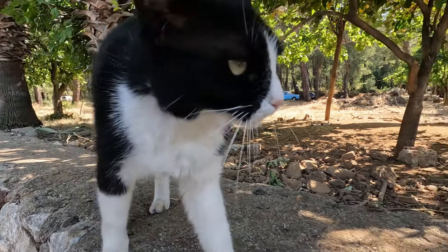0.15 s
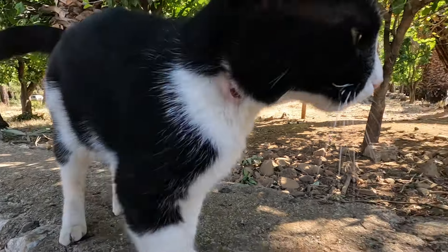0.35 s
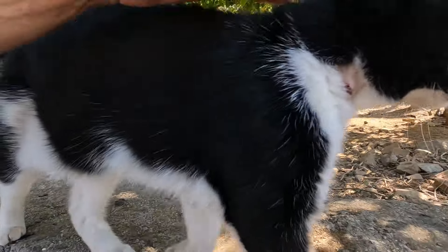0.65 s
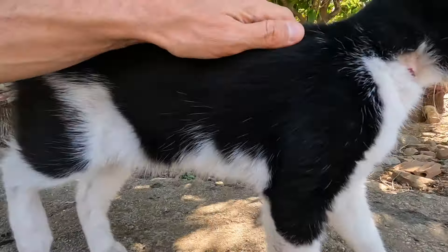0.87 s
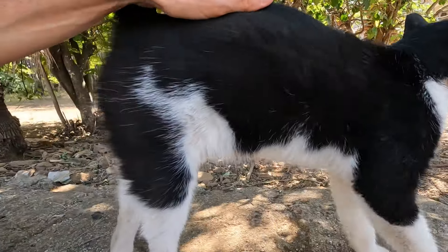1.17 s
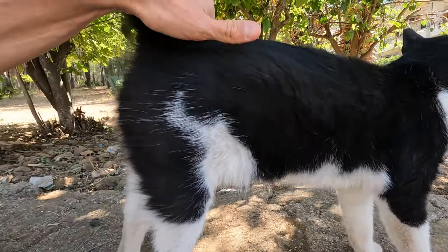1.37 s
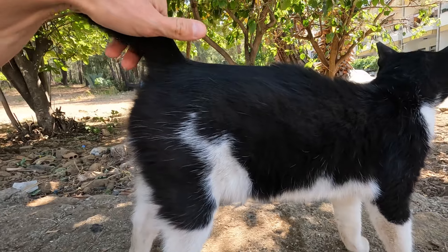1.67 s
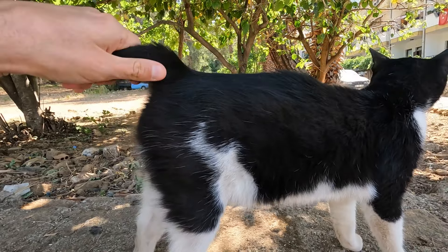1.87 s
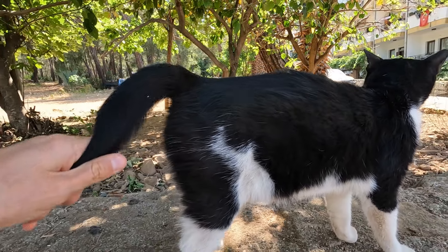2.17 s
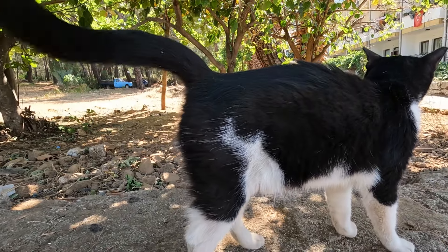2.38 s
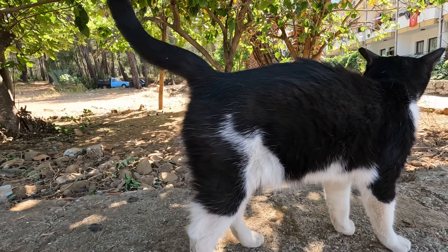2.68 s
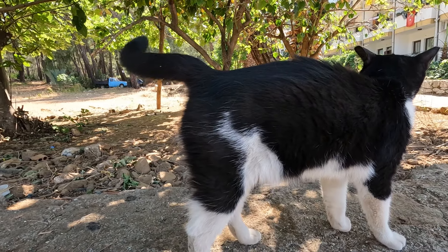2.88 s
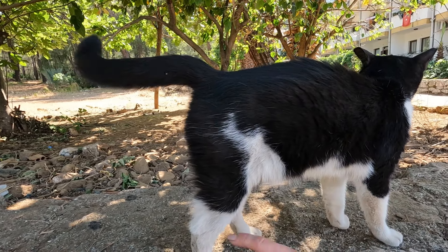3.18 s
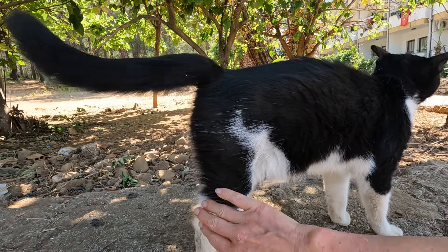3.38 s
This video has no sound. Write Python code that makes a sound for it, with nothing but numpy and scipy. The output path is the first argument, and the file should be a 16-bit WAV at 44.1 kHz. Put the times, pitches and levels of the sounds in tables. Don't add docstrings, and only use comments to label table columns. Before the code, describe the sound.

Cat trills, snorts and mews briefly, then quiet yard with distant engine, insects and birds.

```python
import sys
import numpy as np
from scipy import signal
from scipy.fft import rfft, irfft
from scipy.io import wavfile
from scipy.ndimage import uniform_filter1d

SR = 44100
rng = np.random.default_rng(int(sys.argv[2]) if len(sys.argv) > 2 else 0)


def gain_from_decibels(decibels):
    exponent = np.asarray(decibels, float) / 20
    return 10 ** exponent


def store_wav(level_fs):
    pcm = np.round(np.clip(np.atleast_2d(level_fs), -1, 1) * 32767)
    wavfile.write(sys.argv[1], SR, pcm.T.astype(np.int16))


N = 156114


def evened(x):
    return x / np.sqrt(np.mean(x ** 2) + 1e-20)


def read(points, hz):
    f, value = np.transpose(points)
    return np.interp(np.log(hz + 1), np.log(f + 1), value)


def curves(rows):
    t, columns = np.arange(N) / SR, np.transpose(rows)
    first, last = columns[0, 0], columns[0, -1]
    since_start = t - first + 1e-9 + (first < .01)
    until_end = last - t + (last > 3)
    gate = np.clip(np.minimum(since_start, until_end) / .008, 0, 1)
    return [np.interp(t, columns[0], v) for v in columns[1:]] + [gate]


def bump(centre, half):
    return np.cos(np.pi / 2 * np.clip((np.arange(N) / SR - centre) / half, -1, 1)) ** 2


def resonate(x, hz, width):
    turn = np.exp(2j * np.pi * np.cumsum(hz * np.ones(len(x))) / SR)
    r = np.exp(-np.pi * width / SR)
    return 2 * (turn * signal.lfilter([1 - r], [1, -r], x / turn)).real


def bands(x, table, slide=1):
    out = 0
    for hz, width, db in table:
        once = resonate(x, hz * slide, width)
        out = out + gain_from_decibels(db) * evened(resonate(once, hz * slide, width))
    return out


def slow(rate):
    t = np.arange(0, N, 64) / SR
    v = 0
    for f in np.geomspace(rate / 10, rate, num=20):
        v = v + np.sin(2 * np.pi * (f * t + rng.random())) / np.sqrt(f)
    return np.interp(np.arange(N) / SR, t, evened(v))


# (frequency [Hz], likeness [0-1])
EAR_LIKENESS = [(60, .95), (150, 1), (380, 0.94), (950, 0.71), (2380, 0.43), (5980, 0.53), (15000, 0.45)]


def field(colour, patchy_db, size):
    frames, hz = 4 * N // size + 5, np.fft.rfftfreq(size, 1 / SR)
    a, b, c, d, patches = rng.standard_normal((frames, len(hz), 5)).T
    patches = uniform_filter1d(patches, size=10, axis=0)
    patches = evened(uniform_filter1d(patches, size=10, axis=1))
    same = np.clip(read(EAR_LIKENESS, hz), -1, 1)[:, None]
    left = a + 1j * b
    right = same * left + np.sqrt(1 - same ** 2) * (c + 1j * d)
    inside = (hz >= colour[0][0]) & (hz <= colour[-1][0])
    gain = gain_from_decibels(read(colour, hz)[:, None] + patchy_db * patches) * inside[:, None]
    z = np.array([left, right]) * gain
    return evened(signal.istft(z, nperseg=size, noverlap=3 * size // 4)[1][:, :N])


# (frequency [Hz], level [dB])
RUMBLE_COLOUR = [(8.8, -45), (15, 1), (54, -1.5), (76, -3), (113, -3), (194, -8), (295, -12.5), (476, -25),
                 (600, -28.5), (780, -51), (1320, -120)]


def rumble():
    return gain_from_decibels(-32.5 + .8 * slow(9)) * field(RUMBLE_COLOUR, patchy_db=1.2, size=4096)


# (frequency [Hz], level [dB])
WASH_COLOUR = [(400, -6.5), (850, 0), (1130, 3), (2200, -14.5), (3300, -17), (6000, -29.5), (11500, -31.5),
               (15500, -53)]


def wash():
    return gain_from_decibels(-47) * field(WASH_COLOUR, patchy_db=1.42, size=512)


# (centre [s], half length [s], frequency [Hz], width [Hz], level [dB])
DRONE_SWELLS = [
    (.72, .2, 122, 8, -35),
    (.95, .35, 160, 8, -38),
    (.95, .5, 900, 160, -50),
    (2.45, .05, 2500, 200, -62),
    (2.9, .09, 3600, 1300, -57),
    (2.9, .9, 4900, 1100, -66),
]


def drones():
    out = 0
    for s, half, hz, width, db in DRONE_SWELLS:
        out = out + bump(s, half) * bands(rng.standard_normal(N), [(hz, width, db)])
    return out


# (time [s], firing rate [Hz], level [dB])
ENGINE_RUN = [(0, 55.94, -33.5), (.3, 58.17, -29.5), (.55, 59.36, -35.5), (.8, 61.67, -45),
              (1.15, 63.4, -33.5), (1.35, 65.56, -31.5), (1.6, 66.8, -31.5), (2.1, 68.65, -33),
              (2.3, 69.33, -32.5), (2.8, 70.1, -33), (3.54, 72.12, -31.5)]
ENGINE_ORDERS = [-1, -8, -16, -20.5]


def engine():
    hz, db, on = curves(ENGINE_RUN)
    waver_hz, throb_db = 2.85 / 4, 1
    phase = 2 * np.pi * np.cumsum(hz + waver_hz * slow(11)) / SR
    orders = 0
    for k, order_db in enumerate(ENGINE_ORDERS, 1):
        throb = throb_db * slow(5.3) * min(k, 2) / 2
        orders = orders + gain_from_decibels(order_db + throb) * np.cos(k * phase)
    return np.sqrt(2) * gain_from_decibels(db) * orders


# (frequency [Hz], width [Hz], level [dB])
INSECT_BANDS = [(7470, 1600, -61), (9700, 1300, -70)]


def insects():
    swarms = np.array([bands(rng.standard_normal(N), INSECT_BANDS) for ear in "lr"])
    spread = np.array([[0.86, 0.24], [0.27, 0.72]])
    return spread @ swarms * gain_from_decibels(0.6 * slow(60))


# (start [s], length [s], from [Hz], to [Hz], level [dB])
BIRD_HOOKS = [
    (2.668, .065, 6000, 5220, -63),
    (2.915, .065, 3800, 4700, -60),
    (3.06, .045, 5500, 5000, -63),
    (3.108, .055, 6300, 5050, -60),
    (2.47, .045, 4200, 4750, -64),
    (2.23, .04, 5600, 5400, -70),
    (2.415, .05, 2600, 2480, -66),
]
# (start [s], length [s], from [Hz], to [Hz], level [dB])
BIRD_SWEEPS = [
    (2.375, .04, 5200, 4200, -68),
    (2.832, .07, 4900, 3150, -59),
    (3.285, .04, 5500, 3700, -58),
    (3.385, .055, 3700, 4800, -62),
    (3.085, .02, 5400, 6500, -69),
    (2.9, .04, 3200, 3900, -68),
    (3.33, .035, 3500, 2800, -67),
    (2.44, .025, 4900, 4400, -67),
]


def birds():
    t, out, fuzz = np.arange(N) / SR, np.zeros(N), slow(400)
    hooks = [(*row, 4.2) for row in BIRD_HOOKS]
    sweeps = [(*row, 1.2) for row in BIRD_SWEEPS]
    for s, length, from_hz, to_hz, db, bend in hooks + sweeps:
        u = np.clip((t - s) / length, 0, 1)
        hz = to_hz + (from_hz - to_hz) * (1 - u) ** bend + 45 * fuzz
        swell = np.sqrt(2 * np.sin(np.pi * u).clip(0)) * gain_from_decibels(1.5 * slow(300))
        out += gain_from_decibels(db) * swell * np.sin(2 * np.pi * np.cumsum(hz) / SR)
    taps = rng.standard_normal((2, 4000)) * (rng.random((2, 4000)) < .05)
    taps = taps * gain_from_decibels(-np.arange(4000) / 160)
    taps = taps / np.linalg.norm(taps[0])
    return out + gain_from_decibels(-1.5) * signal.fftconvolve(out[None], taps, axes=1)[:, :N]


# (time [s], wash level [dB], left over right [dB])
CAMERA_TURN = [
    (0, 7.5, 4.5),
    (.5, 5, 3.5),
    (.9, 4, 1.5),
    (1.3, 2.5, 3.5),
    (2.1, 1.5, 2.5),
    (3.54, 1, 3),
]


def surroundings():
    wash_db, pan_db, on = curves(CAMERA_TURN)
    road = wash()
    dull = signal.sosfiltfilt(signal.butter(4, 1800, fs=SR, output="sos"), road)
    treble_db = .55 * wash_db + 0.87
    far = gain_from_decibels(wash_db) * dull + gain_from_decibels(treble_db) * (road - dull) + insects() + birds() + drones()
    return far * gain_from_decibels([pan_db / 2, -pan_db / 2])


# (time [s], peak level [dB], frequency [Hz])
CLAW_TICKS = [(.629, -43, 6800), (.667, -50, 5600), (.7358, -46, 4300), (.7468, -46, 5600),
              (.7752, -40, 4400), (.8415, -41, 3600), (.842, -43, 6800), (.8455, -54, 10000),
              (1.1833, -41, 3200), (1.197, -38, 3000), (1.427, -35, 1200), (1.475, -55, 10000),
              (1.52, -55, 10000), (1.556, -46, 5500), (1.604, -47, 5500), (2.97, -48, 2800)]
# (start [s], length [s], level [dB], centre [Hz])
PAW_SCUFFS = [
    (1.176, .03, -44, 3200),
    (1.178, .035, -65, 8000),
    (1.21, .16, -54, 3300),
    (1.4, .12, -61, 4800),
    (1.553, .02, -54, 4500),
    (1.585, .06, -54, 4800),
    (1.57, .08, -68, 8000),
    (2.32, .03, -60, 5000),
    (2.79, .05, -61, 4800),
]


def handling():
    out, t = np.zeros((2, N)), np.arange(300) / SR
    for s, db, hz in CLAW_TICKS:
        crack = rng.standard_normal(300) + .5 * rng.standard_normal((2, 300))
        crack = gain_from_decibels(-60 * t / .005) * crack
        tick = signal.lfilter(*signal.butter(2, [hz * .7, hz * 1.4], "band", fs=SR), crack)
        start = round(s * SR)
        out[:, start:start + 300] += gain_from_decibels(db) * tick / abs(tick).max()
    grains_per_s, spread_db = 2000, 3
    grains = rng.standard_normal(N) * (rng.random(N) < grains_per_s / SR)
    grains = grains * gain_from_decibels(spread_db * rng.exponential(1, N).clip(0, 4))
    grit = .5 * rng.standard_normal((2, N)) + grains
    for s, length, db, hz in PAW_SCUFFS:
        u = np.clip((np.arange(N) / SR - s) / length, 0, 3)
        b, a = signal.butter(3, [hz * .68, hz * 1.6], "band", fs=SR)
        stroke = np.minimum(u / .15, 1) * np.exp(-1.8 * u ** 2)
        out += gain_from_decibels(db) * evened(signal.lfilter(b, a, grit)) * stroke
    return out * gain_from_decibels([[1.2], [-1.2]])


# (time [s], level [dB])
SNORT_PUSH = [
    (.225, -61),
    (.25, -36.5),
    (.278, -33),
    (.295, -39),
    (.33, -42.5),
    (.395, -48.5),
    (.41, -65),
]
# (frequency [Hz], width [Hz], level [dB])
TIGHT_NOSE = [(1100, 450, 0), (1650, 300, -2), (2750, 500, -8), (3550, 900, -3), (4500, 1100, -5),
              (6400, 700, -11), (12500, 3500, -24)]
# (frequency [Hz], width [Hz], level [dB])
LOOSE_NOSE = [(1180, 830, 5), (1800, 500, -3), (3500, 800, -8), (4360, 700, -5.5), (5900, 800, -8),
              (7300, 600, -12), (12000, 4000, -22)]


def snort():
    db, on = curves(SNORT_PUSH)
    t = np.arange(N) / SR
    air = rng.standard_normal((2, N)) * gain_from_decibels(1.6 * slow(202))
    slide = 1 - .06 * np.clip((.27 - t) / 0.012, 0, 1)
    eased = np.clip((t - .283) / 0.0086 + .5, 0, 1)
    tight = np.sqrt(1 - eased) * evened(bands(air[0], TIGHT_NOSE, slide))
    loose = np.sqrt(eased) * evened(bands(air[1], LOOSE_NOSE))
    return on * gain_from_decibels(db) * (tight + loose)


# (time [s], pitch [Hz], level [dB])
MEW_LINE = [
    (.398, 293.7, -51),
    (.406, 276.5, -35),
    (.414, 281, -14),
    (.43, 275.5, -17.5),
    (.446, 244, -16.5),
    (.468, 165, -20.5),
    (.48, 175, -26.5),
    (.495, 140, -51),
]
MEW_OVERTONES = [-17, -22, -27, -35, -35]
# (frequency [Hz], width [Hz], level [dB])
MEW_BREATH = [(3550, 380, -43), (2600, 900, -53), (5750, 200, -60), (1100, 600, -53)]


def mew():
    hz, db, on = curves(MEW_LINE)
    open_s = .456
    phase, parted = 2 * np.pi * np.cumsum(hz) / SR, bump(open_s, .044)
    overtones = sum(gain_from_decibels(d) * np.cos(k * phase) for k, d in enumerate(MEW_OVERTONES, 2))
    slide = 1 + .3 * np.clip(np.arange(N) / SR - .45, -.05, .05)
    pulsed = (1 + .8 * np.cos(phase)) * rng.standard_normal(N)
    puff = bump(open_s - .008, .026) + gain_from_decibels(-10) * bump(open_s + .002, .055)
    air = bands(pulsed, MEW_BREATH, slide) * puff
    return on * np.sqrt(2) * gain_from_decibels(db) * (np.cos(phase) + parted * overtones) + air


# (time [s], pitch [Hz], level [dB])
TRILL_HUM = [
    (0, 167, -30),
    (.025, 163.9, -27),
    (.06, 188.8, -26.5),
    (.095, 193.7, -30),
    (.135, 202.2, -25.5),
    (.18, 209, -31.5),
    (.205, 232.7, -27),
    (.232, 182, -23.5),
    (.27, 164.8, -35),
]
# (strongest pulse [s], half length [s], level [dB], brightness [dB], leak [s])
THROAT_FLAPS = [
    (.0225, .014, -33, -23, .012),
    (.059, .013, -31, -22, .046),
    (.0925, .013, -30, -22, .083),
    (.1305, .011, -32.5, -26, .117),
    (.172, .011, -36, -40, .156),
    (.213, .022, -29.5, -24, .194),
]
# (frequency [Hz], level [dB])
OPEN_THROAT = [(250, 3.5), (450, 7), (650, 0), (850, 7), (1100, -13.5), (1350, -22), (1700, -25),
               (2200, -60)]
# (frequency [Hz], width [Hz], level [dB])
BRIGHT_THROAT = [(2920, 300, 9), (2500, 450, 3), (3400, 500, 1)]


def trill():
    hz, hum_db, on = curves(TRILL_HUM)
    t, beats = np.arange(N) / SR, np.transpose(THROAT_FLAPS)[0]
    phase = 2 * np.pi * np.cumsum(hz * (1 + 0.012 * slow(83))) / SR
    slip = np.angle(np.exp(1j * np.interp(beats - .002 * (beats > .2), t, phase)))
    nearest = np.searchsorted((beats[1:] + beats[:-1]) / 2, t)
    phase = phase - uniform_filter1d(slip[nearest], size=400)

    low = sum(gain_from_decibels(read(OPEN_THROAT, k * hz) + 1.3 * slow(36.7)) * np.cos(k * phase) for k in range(2, 11))
    breath = bands((1.3 + np.cos(phase)) * rng.standard_normal(N), [(950, 600, -5)])
    rasp = 2.4 * (1 + np.cos(phase)) * rng.standard_normal(N)
    high = bands(sum(np.cos(k * phase) for k in range(8, 24)) + rasp, BRIGHT_THROAT)

    opens = []
    for s, half, *rest in THROAT_FLAPS:
        inside = half - abs(t - s - .1 * half)
        opens.append(np.sin(np.pi / 2 * np.clip(inside / .011, 0, 1)) ** 2)
    out = -np.sqrt(2) * gain_from_decibels(hum_db + 4 * sum(opens)) * np.cos(phase - .4) * on
    leak = bands(rng.standard_normal(N), [(3550, 800, -48), (1300, 700, -46)])
    for (s, half, db, bright_db, leak_s), opened in zip(THROAT_FLAPS, opens):
        out = out - opened * gain_from_decibels(db) * (low + breath + gain_from_decibels(bright_db) * high)
        out = out + leak * bump(leak_s, .005)
    return out


# (frequency [Hz], left over right [dB])
CAT_SIDE = [(200, 0.5), (700, 8.5), (2500, 10), (3000, 12), (8000, -5)]


def cat():
    hz = np.fft.rfftfreq(N, 1 / SR)
    pan = read(CAT_SIDE, hz) / 2
    lag = np.exp(np.outer([0, -2j * np.pi * .00003], hz))
    return irfft(rfft(trill() + mew() + snort()) * gain_from_decibels([pan, -pan]) * lag, N)


def scene():
    return rumble() + engine() + surroundings() + handling() + cat()


def low_pass(x):
    return signal.sosfilt(signal.butter(12, 15670, fs=SR, output="sos"), x)


def record(dry):
    return low_pass(dry)


dry = scene()
out = record(dry)
store_wav(out)
```